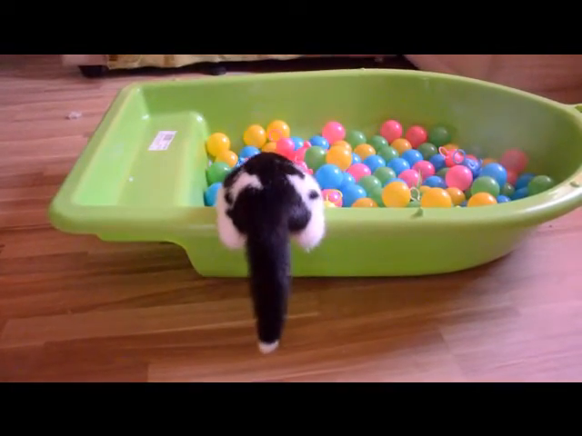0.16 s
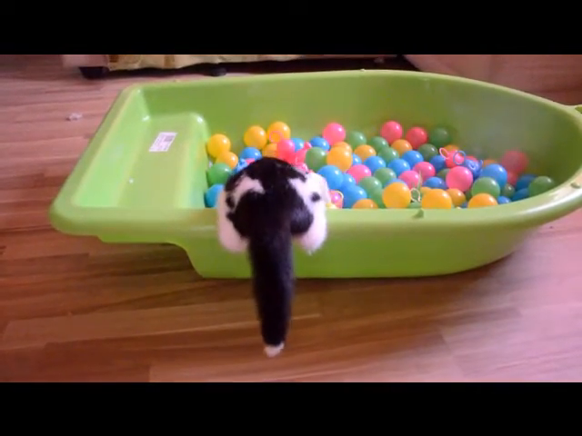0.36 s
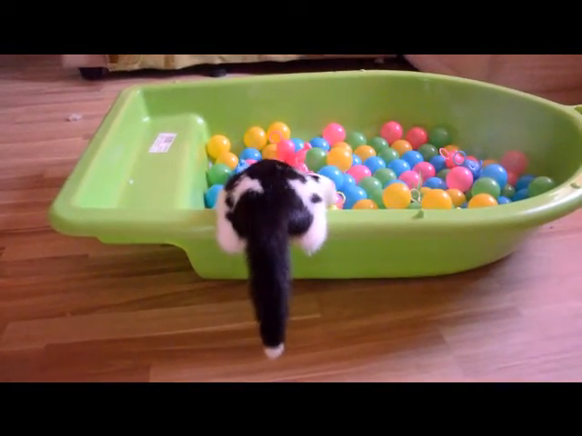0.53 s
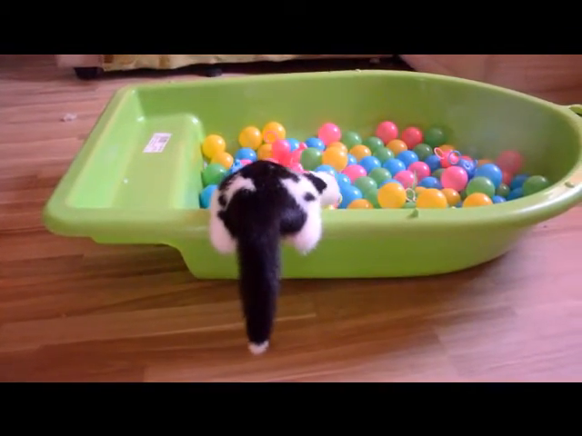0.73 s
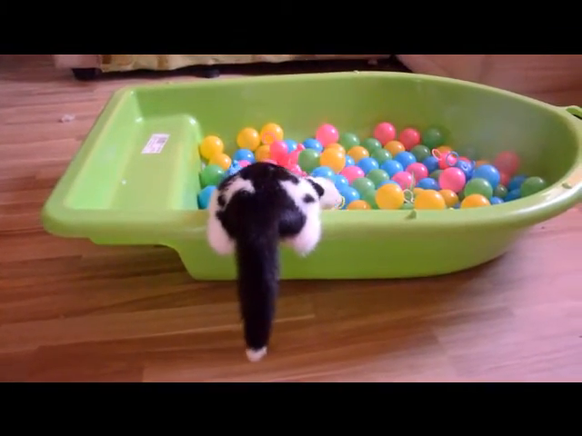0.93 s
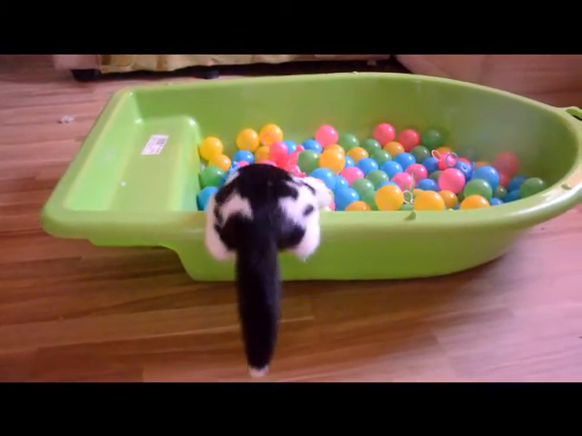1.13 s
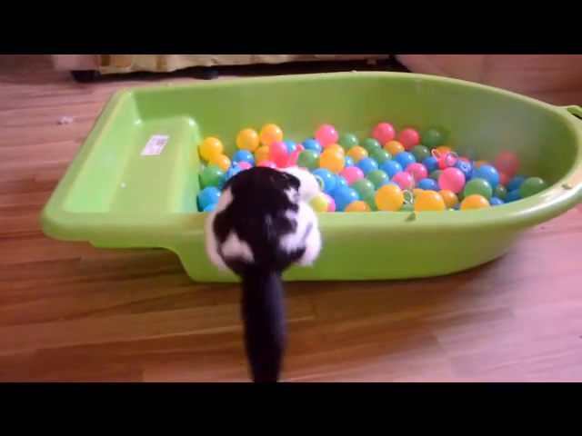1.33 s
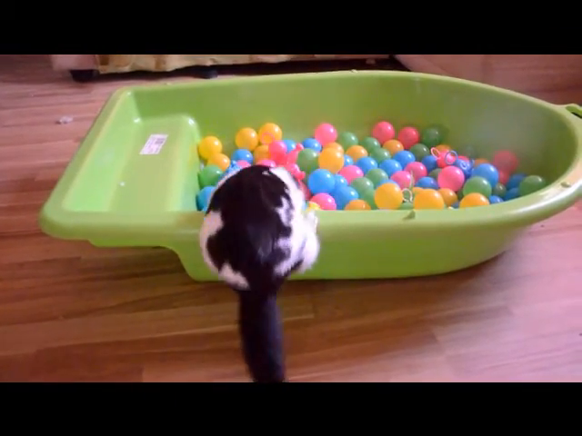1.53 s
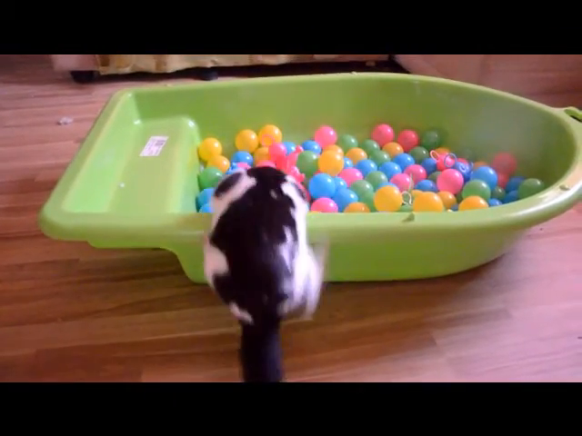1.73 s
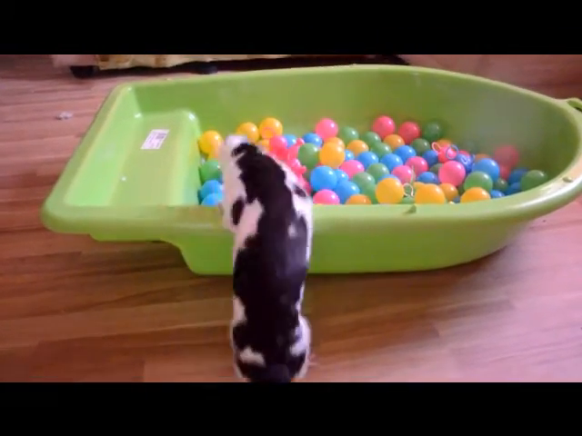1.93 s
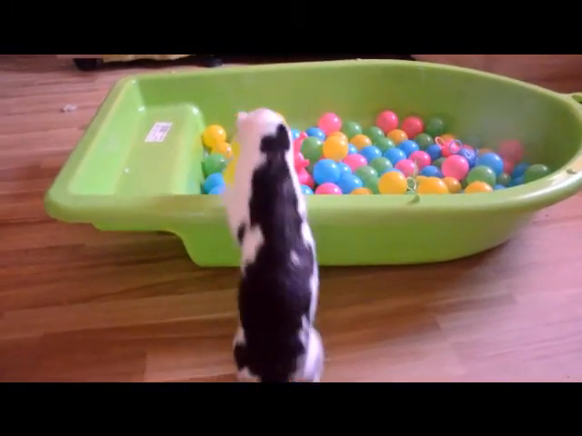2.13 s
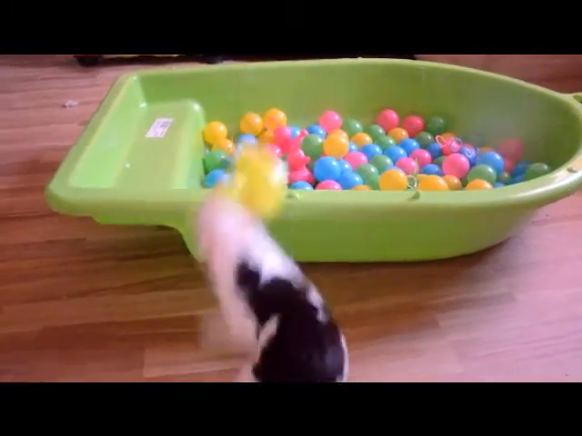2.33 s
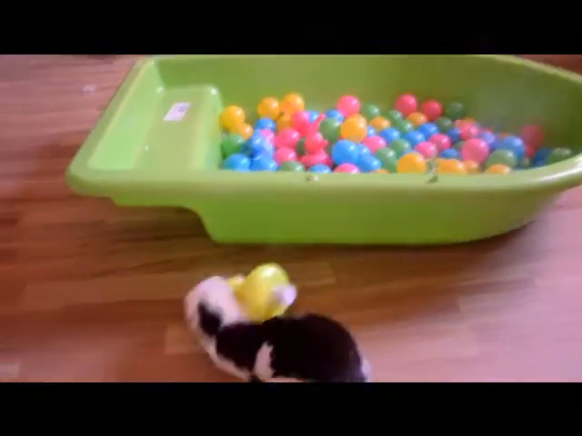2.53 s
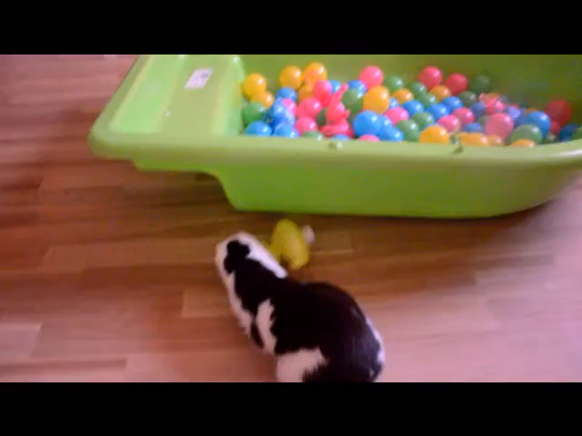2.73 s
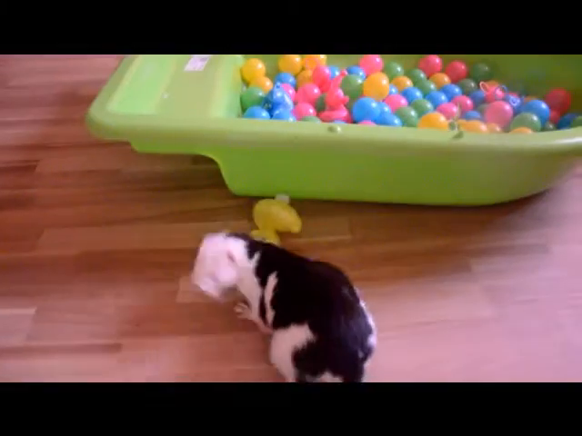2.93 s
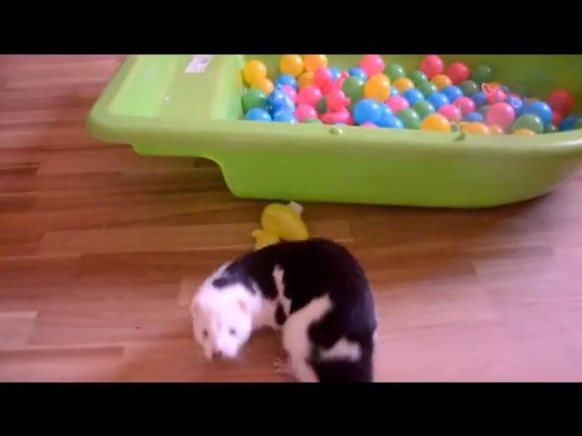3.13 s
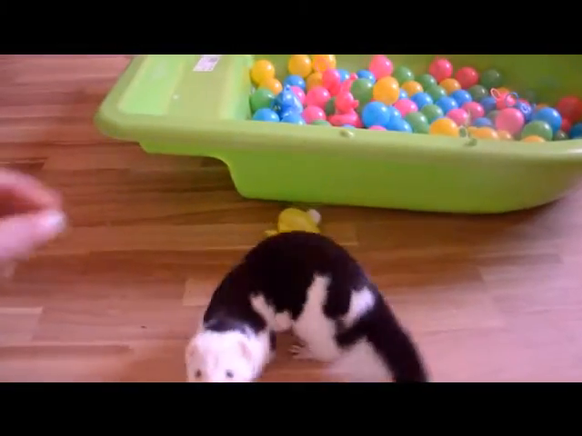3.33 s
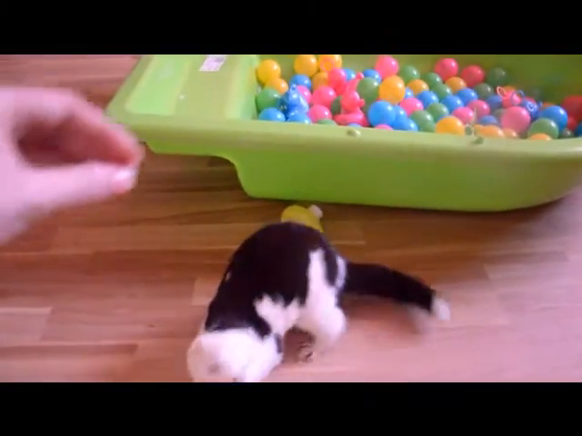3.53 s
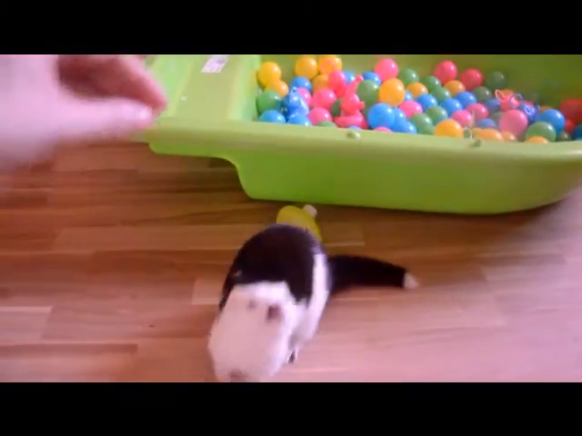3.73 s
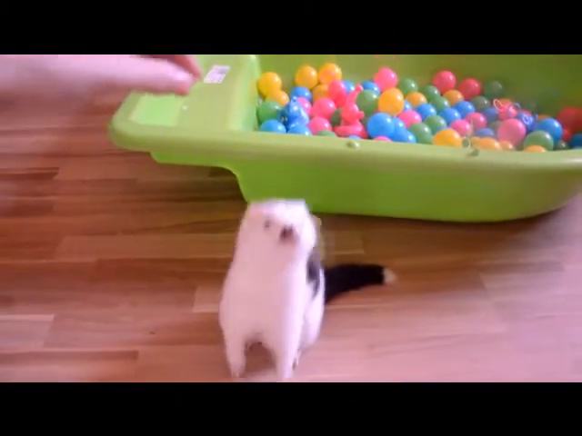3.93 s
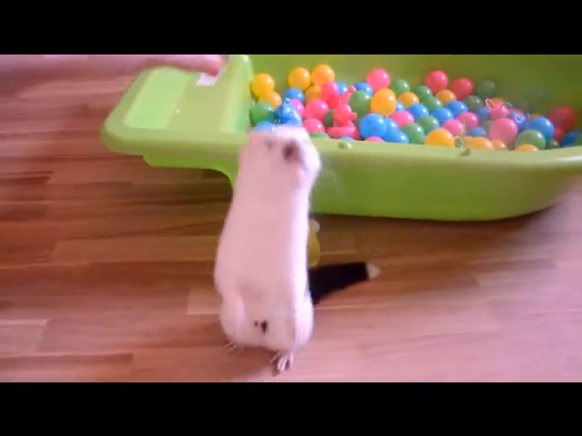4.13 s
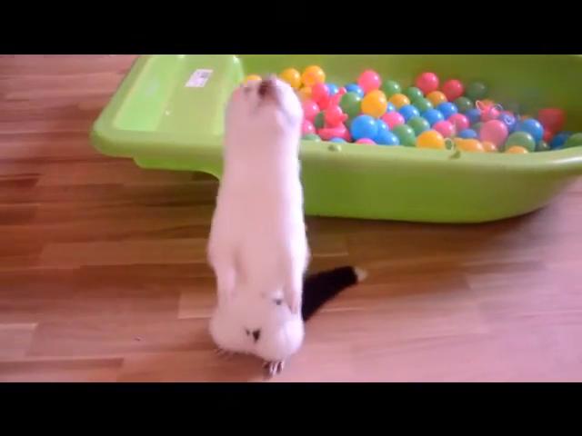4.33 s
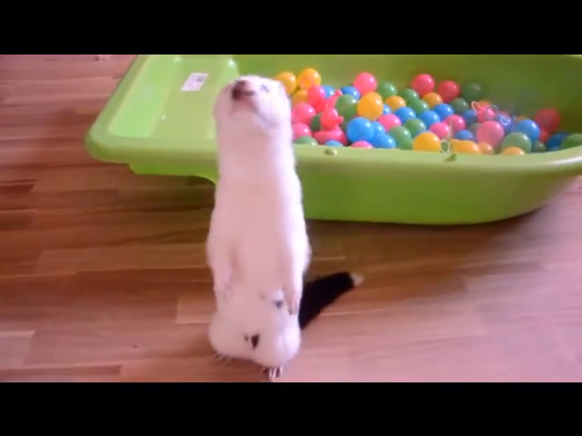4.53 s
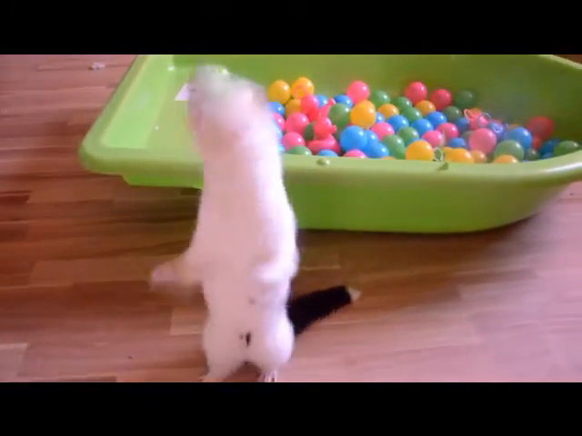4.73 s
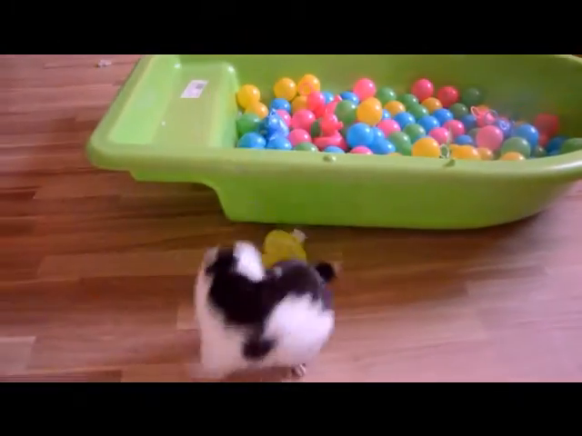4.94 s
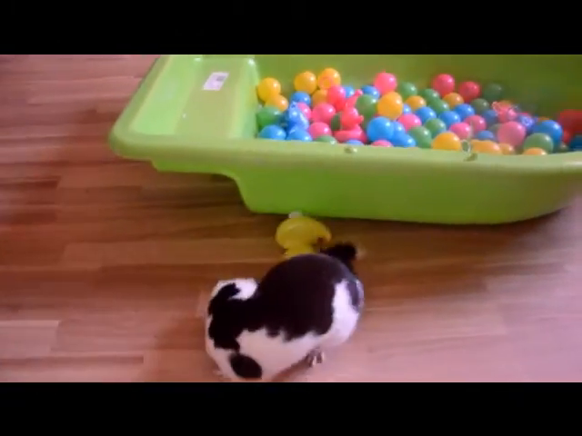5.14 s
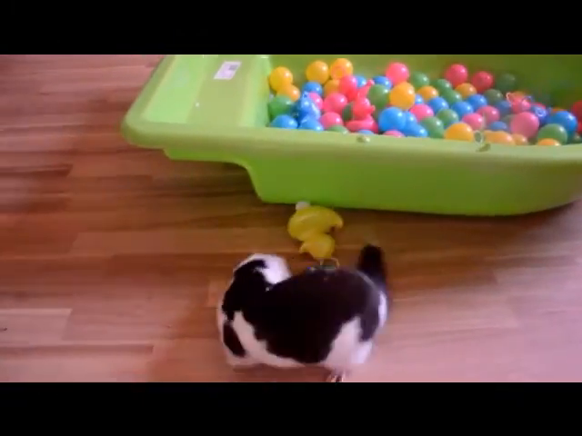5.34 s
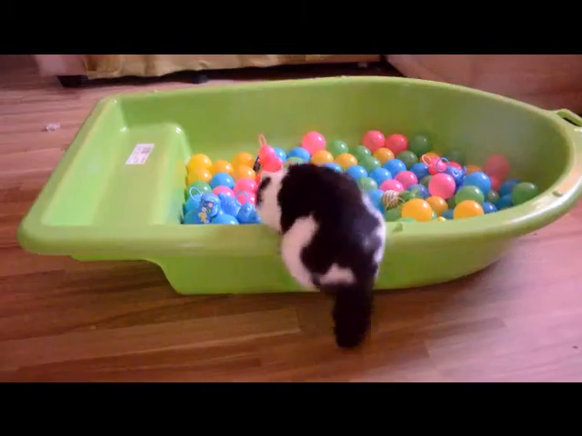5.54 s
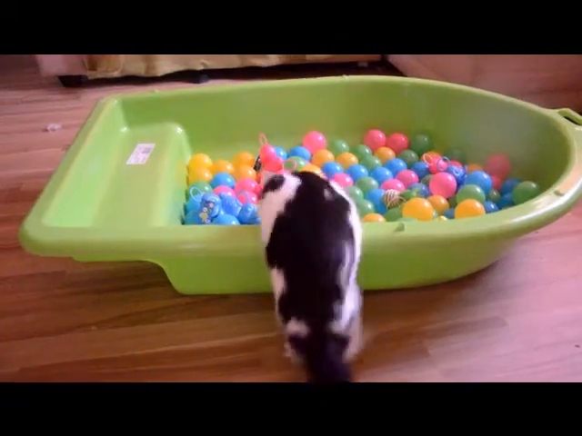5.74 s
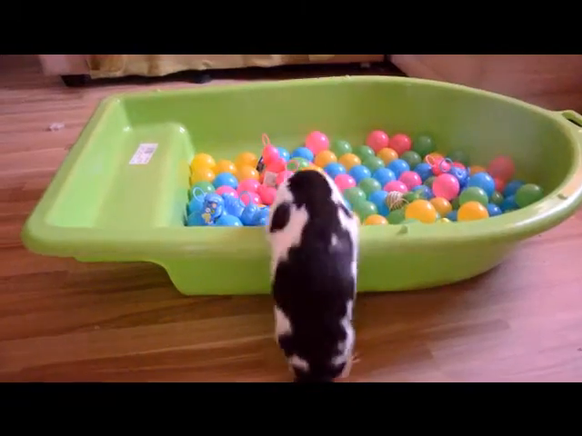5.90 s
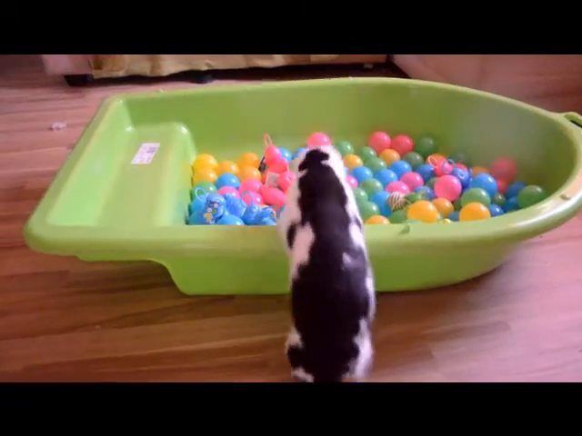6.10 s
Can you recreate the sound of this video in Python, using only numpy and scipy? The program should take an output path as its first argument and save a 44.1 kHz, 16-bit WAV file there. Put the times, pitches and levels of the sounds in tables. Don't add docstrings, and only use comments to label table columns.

```python
import sys
import numpy as np
from scipy import signal
from scipy.fft import rfft, irfft
from scipy.io import wavfile
from scipy.ndimage import uniform_filter1d

SR = 44100
rng = np.random.default_rng(int(sys.argv[2]) if len(sys.argv) > 2 else 0)


def gain_from_decibels(decibels):
    exponent = np.asarray(decibels, float) / 20
    return 10 ** exponent


def generate_wav(sig):
    pcm = np.round(np.clip(np.atleast_2d(sig).T, -1, 1) * 32767).astype(np.int16)
    wavfile.write(sys.argv[1], SR, pcm)


N = 276374


def rms_one(x):
    return x / np.sqrt(np.mean(x ** 2) + 1e-20)


def peak_one(x):
    return x / np.max(np.abs(x))


def at_hz(points, hz):
    points = np.array(points)
    return np.interp(np.log(hz + 1), np.log(points[:, 0]), points[:, 1])


def ring(x, hz, t60):
    r = gain_from_decibels(-60 / (t60 * SR))
    w = 2 * np.pi * hz / SR
    return signal.lfilter([0, np.sin(w)], [1, -2 * r * np.cos(w), r * r], x + 1e-18)


def resonate(x, hz, width):
    r = np.exp(-np.pi * width / SR)
    turn = 2 * np.pi * hz / SR
    y = signal.lfilter([1, 0, -1], [1, -2 * r * np.cos(turn), r * r], x + 1e-18)
    return np.sqrt(1 - r * r) * y / np.sqrt(2)


def body(x, peaks):
    return sum((-1) ** k * gain_from_decibels(db) * resonate(x, hz, width) for k, (hz, width, db) in enumerate(peaks))


# f/Hz, level/dB (per Hz)
HISS_COLOUR = [(18, -58), (30, -19.5), (43, -10.5), (92, -8.5), (146, -11), (644, -15.5), (1000, -10.5),
               (1680, -13), (2070, -18), (3220, -16), (14900, -24)]
# f/Hz, width/Hz, level/dB
FAN = [(60, 12, -76.5), (108, 8, -73), (477, 94, -70), (1253, 70, -72), (2094, 100, -66),
       (2725, 150, -70.5)]
# start t/s, f/Hz, width/Hz, level/dB
WHINE = (6, 6406, 500, -65)
HISS_DB = -59.5


def background():
    hiss = irfft(rfft(rng.standard_normal(N)) * gain_from_decibels(at_hz(HISS_COLOUR, np.fft.rfftfreq(N, 1 / SR))), N)
    air = rng.standard_normal(N)

    def breath(hz, width, db):
        return gain_from_decibels(db) * rms_one(resonate(resonate(air, hz, width), hz, width))

    fan = sum(breath(*peak) for peak in FAN)
    start_s, *peak = WHINE
    fan += breath(*peak) * (np.arange(N) > start_s * SR)
    return gain_from_decibels(HISS_DB) * rms_one(hiss) + fan


# f/Hz, fade by 60 dB t/s
ROOM = [(100, 0.27), (300, 0.27), (1000, 0.25), (4000, .38), (12000, 0.24)]
TAIL = SR // 2


def echo_noise():
    edges = 60 * 2. ** np.arange(9)
    t = np.arange(TAIL) / SR
    bands, decays = [], []
    for low in edges[:8]:
        octave = signal.butter(2, [low, 2 * low], "band", fs=SR, output="sos")
        bands.append(signal.sosfilt(octave, rng.standard_normal(N + TAIL)))
        onset = np.clip((t - .004) / 0.0047, 0, 1)
        decays.append(gain_from_decibels(-60 * t / at_hz(ROOM, 2.7 * low)) * onset)
    return np.array(bands), np.array(decays)


def add(out, s, layers, echo_dbs, echoes):
    at = round(s * SR)
    bands, decays = echoes
    tail = np.sum(bands[:, at:at + TAIL] * decays, axis=0)
    sent = sum(gain_from_decibels(db) * x for db, x in zip(echo_dbs, layers))
    wet = signal.fftconvolve(sent, tail / np.sqrt(np.sum(tail ** 2)))
    wet[:len(sent)] += sum(layers)
    out[at:at + len(wet)] += wet[:N - at]


def moves(starts, levels_db, holds, fall_db_per_s, rise_db_per_s):
    t = np.arange(0, N, 32) / SR
    late = t[:, None] - starts
    swell = rise_db_per_s * np.minimum(late, 0)
    fade = fall_db_per_s * np.maximum(late - holds, 0)
    power = np.sum(gain_from_decibels(levels_db + swell - fade) ** 2, axis=1)
    return np.interp(np.arange(N) / SR, t, power)


# t/s (at full strength), level/dB, held t/s
STEPS = [(0, -44, .03), (.25, -53, .1), (.58, -54, .01), (.77, -52, .13), (.99, -46, .05), (1.15, -48, .1),
         (1.385, -37, .02), (1.545, -41, .06), (1.7, -48, .18), (1.95, -37, .07), (2.42, -54, .13),
         (2.875, -26, .015), (3.02, -49, .19), (3.235, -32, .02), (3.43, -50, .01), (3.82, -60, .03),
         (4.45, -62, .2), (4.71, -49, .01), (4.81, -43, .03), (4.9, -45, .11), (5.035, -37, .015),
         (5.08, -42, .07), (5.315, -46, .01), (5.5, -46, .08), (5.615, -42, .03), (5.68, -48, .08),
         (5.89, -49, .08), (6.08, -45.5, .03), (6.15, -51, .12)]
# t/s (at full strength), level/dB, held t/s, scratch over rub level/dB
CHURNS = [(0, -48, .01, -14), (.25, -60, .1, -3), (.84, -55, .04, -5), (1.01, -50, .02, -6),
          (1.15, -51, .08, -2), (1.4, -41, .01, -12), (1.5, -49, .16, -6), (1.67, -41, .04, -5),
          (1.75, -50, .15, -7), (1.95, -36, .05, -25), (2.12, -38, .04, -4), (2.28, -56, .16, -1),
          (2.66, -42, .04, 1.5), (3, -58, .03, 5), (4.35, -61, .3, -10), (4.67, -62, .02, 9),
          (4.94, -53, .07, 4), (5.02, -55, .08, 7), (5.54, -45, .04, 1.5), (5.625, -39, .025, -10),
          (5.72, -52, .06, -3), (5.81, -50, .03, 5), (5.93, -45, .03, -20), (6.11, -46.5, .04, -12),
          (6.19, -62, .08, 10)]
# t/s (at full strength), level/dB, held t/s
BRUSHES = [(.98, -51, .06), (1.15, -50, .05), (1.37, -51, .02), (1.51, -42, .03), (1.68, -56, .06),
           (2.02, -52, .01), (2.35, -53, .04), (2.59, -33, .04), (2.89, -44, .03), (3.04, -60, .17),
           (4.81, -52, .02), (4.94, -49, .09), (5.56, -50, .03), (5.62, -39, .02), (5.83, -50, .01),
           (6.2, -56, .07)]
RUB_UNDER_STEP_DB, SCRATCH_UNDER_STEP_DB, SHUFFLE_UNDER_CHURN_DB = -13, -21, -11
REST_SHUFFLE_DB, REST_RUB_DB, REST_FUR_DB, REST_SCRATCH_DB = -72, -72, -64, -71
CHURN_RISE_DB_PER_S, STEP_RISE_DB_PER_S = 400, 900
STEP_FALL_DB_PER_S, CHURN_FALL_DB_PER_S, BRUSH_FALL_DB_PER_S = 330, 170, 300


def efforts():
    s, db, held, scratch_db = np.transpose(CHURNS)
    step = moves(*np.transpose(STEPS), STEP_FALL_DB_PER_S, STEP_RISE_DB_PER_S)
    brush = moves(*np.transpose(BRUSHES), BRUSH_FALL_DB_PER_S, STEP_RISE_DB_PER_S)
    churn = moves(s, db, held, CHURN_FALL_DB_PER_S, CHURN_RISE_DB_PER_S)
    sharp = moves(s, db + scratch_db, held, CHURN_FALL_DB_PER_S, CHURN_RISE_DB_PER_S)
    shuffle = step + churn * gain_from_decibels(SHUFFLE_UNDER_CHURN_DB) ** 2 + gain_from_decibels(REST_SHUFFLE_DB) ** 2
    rub = churn + step * gain_from_decibels(RUB_UNDER_STEP_DB) ** 2 + gain_from_decibels(REST_RUB_DB) ** 2
    fur = brush + gain_from_decibels(REST_FUR_DB) ** 2
    scratch = sharp + step * gain_from_decibels(SCRATCH_UNDER_STEP_DB) ** 2 + gain_from_decibels(REST_SCRATCH_DB) ** 2
    return np.sqrt([shuffle, rub, fur, scratch])


def grains(per_s, spread_db):
    sizes = gain_from_decibels(spread_db * np.minimum(rng.exponential(1, N), 4)) * rng.choice([-1, 1], N)
    return rms_one(sizes * (rng.random(N) < per_s / SR))


# f/Hz, level/dB, fade by 60 dB t/s
BOARDS = [(221.4, -11, 0.2), (274.5, 4, 0.086), (344.4, -2.5, 0.095), (402.5, -8.5, .12)]
# f/Hz, width/Hz, level/dB
BALLS = [(725, 320, 3), (1066, 610, 4.5), (1438, 1400, 5)]
# f/Hz, width/Hz, level/dB
FUR = [(2100, 1100, -2), (2900, 1500, 0), (4100, 2200, -7)]
# f/Hz, width/Hz, level/dB
BRIGHT = [(5370, 4160, -4), (8030, 2000, -0.5), (9415, 2000, -0.5), (11800, 5000, -14.5)]


def stirring():
    shuffling, rubbing, brushing, scratching = efforts()
    steps = grains(550, 3.6)
    shuffle = rms_one(sum(gain_from_decibels(db) * ring(steps, hz, 0.43 * t60) for hz, db, t60 in BOARDS))
    rub = rms_one(resonate(body(grains(1200, 2.6), BALLS), 790, 1800))
    fur = rms_one(body(body(grains(4000, 3), FUR), FUR))
    scratch = rms_one(body(grains(4600, 4.2), BRIGHT))
    low = gain_from_decibels(-2) * shuffling * shuffle
    middle = gain_from_decibels(-3.5) * rubbing * rub + gain_from_decibels(-5.5) * brushing * fur
    high = gain_from_decibels(-6) * scratching * scratch
    return low, middle, high


# t/s, knock level/dB, shake level/dB, tick level/dB, contact spread t/s
TUB_BUMPS = [(.731, -45.5, -50, -63, .008), (.986, -36, -40, -46, .012), (1.368, -32.5, -38, -47, .014),
             (1.38, -32, -32, -46, .0057), (1.401, -26, -34, -55, .008), (1.544, -33, -43, -56, .012),
             (1.845, -34.5, -36.5, -44.5, .0046), (1.943, -21, -33, -70, .007),
             (2.136, -22.5, -27, -28.5, .016), (2.358, -31.5, -40.5, -42, .0058),
             (2.885, -27, -30, -31, .017), (3.271, -36.5, -35, -50, .0053),
             (5.613, -19.5, -33.5, -36, .0043)]
# t/s, knock level/dB, tick level/dB, knock colour f/Hz
CLACKS = [(.849, -36, -56, 1100), (1.671, -24.5, -17.5, 1720), (1.693, -21, -33, 880),
          (1.712, -26.5, -30, 1400), (1.733, -20.5, -26, 1750), (1.997, -22, -48, 910),
          (1.999, -31, -50, 3800), (2.285, -31, -48, 950), (2.403, -34, -41, 1880),
          (2.449, -39.5, -43, 1880), (5.508, -39, -47.5, 1360), (5.551, -26, -34.5, 920),
          (5.556, -29.5, -30, 1600), (5.717, -35, -62, 1350), (5.804, -31, -33, 1700),
          (5.918, -31, -54, 735), (6.11, -27.5, -65, 890)]
# t/s, knock level/dB, tick level/dB, knock colour f/Hz
CLAWS = [(1.144, -42, -55, 2550), (1.205, -41, -37, 2730), (1.504, -31, -56, 2700), (1.53, -32, -60, 2800),
         (2.752, -27.5, -40, 2320), (3.047, -37, -39, 2900), (3.073, -37.5, -49, 2900),
         (3.096, -37, -46, 4230), (3.137, -45, -47, 4396), (3.157, -39, -45, 2790), (3.177, -48, -52, 3680),
         (3.203, -38, -47, 3200), (5.483, -44, -52, 2940), (5.947, -27, -38, 4300), (5.974, -32, -46, 4500)]
TUB_HZ = 860
CLACK_SPREAD_S, CLACK_SHAKE_DB = .0055, -22
CLAW_SPREAD_S, CLAW_SHAKE_DB = .004, -19


def contacts():
    rows = [(s, knock, shake, tick, TUB_HZ, spread) for s, knock, shake, tick, spread in TUB_BUMPS]
    rows += [(s, knock, knock + CLACK_SHAKE_DB, tick, hz, CLACK_SPREAD_S) for s, knock, tick, hz in CLACKS]
    rows += [(s, knock, knock + CLAW_SHAKE_DB, tick, hz, CLAW_SPREAD_S) for s, knock, tick, hz in CLAWS]
    return rows


# t/s, level/dB, f/Hz, fade by 60 dB t/s
SQUEAKS = [
    (5.482, -38.5, 1360, 0.087),
    (5.5, -43, 1420, 0.044),
    (5.08, -39, 276, .4),
    (5.109, -35, 276, .17),
    (3.047, -50, 2800, .12),
    (3.073, -50, 2820, .15),
    (3.157, -54, 2800, .15),
    (2.403, -42, 2050, .05),
    (2.449, -45, 2100, .06),
]
HOLLOW_WIDTH, MAX_WIDTH_HZ = 1.1, 1900


def bumps(echoes):
    out, t = np.zeros(N), np.arange(SR // 5) / SR
    for s, knock_db, shake_db, tick_db, hz, spread in contacts():
        noise = rng.standard_normal((3, len(t)))
        fade = np.exp(-t / np.clip(spread, 5e-4, .04))
        chatter = noise * np.abs(noise) * fade * np.minimum(t / 0.0011, 1)
        shake = sum(gain_from_decibels(db) * ring(chatter[0], f, 1.2 * t60) for f, db, t60 in BOARDS)
        width = min(HOLLOW_WIDTH * hz, MAX_WIDTH_HZ)
        knock = resonate(resonate(chatter[1], hz, width), hz, width)
        touch = chatter[2] * (1 + 3 * np.exp(-t / .0015)) + 5.0 * (t == t[9])
        tick = body(touch, BRIGHT)
        layers = [gain_from_decibels(shake_db + 1) * peak_one(shake),
                  gain_from_decibels(knock_db - 2) * peak_one(knock),
                  gain_from_decibels(tick_db + 5.5) * peak_one(tick)]
        add(out, s, layers, [-3, -3, -3], echoes)
    for s, db, hz, t60 in SQUEAKS:
        out[round(s * SR):][:len(t)] += gain_from_decibels(db) * np.sin(2 * np.pi * hz * t) * gain_from_decibels(-60 * t / t60)
    return out


def bending(t, hz, turns, fall_s):
    cycles = hz * t + turns * (1 - np.exp(-t / fall_s))
    return np.sin(2 * np.pi * cycles) * (1 - np.exp(-t / .0012))


def splinters(noise, t, length_s):
    crack = noise * np.abs(noise) * 0.35 * np.exp(-t / length_s)
    crack[0] = 2.1
    return crack


# t/s, thud level/dB, knock level/dB, tick level/dB, thud f/Hz
DROPS = [(2.106, -14.5, -8.5, -20, 253), (2.5766, -3, -9, -17, 274), (2.623, -10.5, -22, -24, 259.5),
         (2.713, -9.5, -22.5, -31, 267.5), (2.776, -13, -26, -30.5, 263.6),
         (2.823, -14.5, -25.5, -33.5, 276), (2.863, -13, -18.5, -25.5, 353), (3.226, -20, -24, -44, 320),
         (3.426, -37, -46.5, -70, 287), (3.81, -51, -63, -67.5, 404), (4.696, -44, -55, -61.5, 202),
         (4.803, -32.5, -40, -54, 216), (4.928, -39, -43, -47, 341), (5.033, -33, -41, -44, 369),
         (5.303, -34.5, -47, -64, 285.6), (6.073, -29, -43, -51, 264), (6.2545, -22.5, -29, -41, 240)]
# f/Hz, level/dB, fade by 60 dB t/s
TOY = [(202.4, -14, 0.1), (467, -8.5, 0.0295), (690, -8, .02), (879, -1, 0.017), (980, -3, 0.024),
       (1310, -4, .015), (1590, -2.5, 0.013), (1880, -4.5, .015)]
# f/Hz, width/Hz, level/dB
CRACK = [(2900, 2000, 2.5), (4800, 4100, 1), (9100, 2500, -3.5)]
# t/s, level/dB, f/Hz
SLAM = (2.5782, 7, 300)
# t/s, level/dB, f/Hz, fade by 60 dB t/s
BOOM = (2.107, -18, 95, .15)
RING_T60_S, DAMPED_T60_S, RING_S_PER_DB = .18, .04, .012
JOIST_HZ, JOIST_DB, JOIST_T60_S = 205, -19, .22


def drops(echoes):
    out, t = np.zeros(N), np.arange(SR // 4) / SR
    strike = t * np.exp(-t / 0.00007)
    joist = gain_from_decibels(JOIST_DB - 60 * t / JOIST_T60_S) * np.sin(2 * np.pi * JOIST_HZ * t) * (1 - np.exp(-t / .004))
    for s, thud_db, knock_db, tick_db, hz in DROPS:
        noise = rng.standard_normal(len(t))
        t60 = min(RING_T60_S, DAMPED_T60_S - RING_S_PER_DB * thud_db)
        fade = np.exp(-t / .0028) + .28 * gain_from_decibels(-60 * t / t60)
        push = bending(t, hz, turns=.3, fall_s=.0008) * fade + joist
        knock = sum(gain_from_decibels(db + 2 * noise[-k - 1]) * ring(strike, f, ring_s)
                    for k, (f, db, ring_s) in enumerate(TOY))
        snap = splinters(noise, t, 0.0039)
        crack = sum(gain_from_decibels(db) * resonate(snap, f, width) for f, width, db in CRACK)
        layers = [gain_from_decibels(thud_db + 5) * push,
                  gain_from_decibels(knock_db + 8.5) * peak_one(knock),
                  gain_from_decibels(tick_db + 11) * peak_one(crack)]
        add(out, s + 0.000912, layers, [-12.5, -4, -4], echoes)
    s, slam_db, hz = SLAM
    slam = -gain_from_decibels(slam_db) * bending(t, hz, turns=1.4, fall_s=.002) * np.exp(-t / .0022)
    add(out, s, [slam], [-18], echoes)
    s, boom_db, hz, t60 = BOOM
    boom = gain_from_decibels(boom_db - 60 * t / t60) * np.sin(2 * np.pi * hz * t)
    add(out, s, [boom], [-5], echoes)
    return out


MIC_LOW_HZ, MIC_TOP_HZ = 157, 12900


def scene():
    echoes = echo_noise()
    stir = np.zeros(N)
    add(stir, 0, stirring(), [-6, -6, -6], echoes)
    contact = stir + bumps(echoes) + drops(echoes)
    lean = signal.sosfilt(signal.butter(2, MIC_LOW_HZ, "high", fs=SR, output="sos"), contact)
    lean = signal.sosfilt(signal.butter(4, MIC_TOP_HZ, fs=SR, output="sos"), lean)
    return (lean + background())[None]


QUIET_DB, BUSY_DB, LOUD_DB = -62, -50, -36
WIDE_HZ, NARROW_HZ, LOUD_HZ = 14700, 13900, 12900


def narrowed(x):
    hz, s, spec = signal.stft(x, SR, nperseg=2048, noverlap=1024)
    power = uniform_filter1d(x[0] ** 2, size=8192)
    level_db = 10 * np.log10(power[np.minimum(s * SR, N - 1).astype(int)] + 1e-12)
    jitter = 350 * np.repeat(rng.integers(-1, 2, len(s)), 3)[:len(s)]
    edge = np.where((level_db > BUSY_DB) | (level_db < QUIET_DB), NARROW_HZ, WIDE_HZ) + jitter
    edge[level_db > LOUD_DB] = LOUD_HZ
    return signal.istft(spec * (hz[:, None] < edge), SR, nperseg=2048, noverlap=1024)[1][:, :N]


def low_pass(x):
    return signal.sosfilt(signal.butter(12, 15080, fs=SR, output="sos"), x)


# t/s, level/dB
DIP = [
    (5.3805, 0),
    (5.3815, -17),
    (5.395, -22),
    (5.402, -35),
    (5.4145, -26),
    (5.4155, -9),
    (5.48, -3),
    (5.52, 0),
]
OVERLOAD = .51


def record(dry):
    s, db = np.transpose(DIP)
    gain = gain_from_decibels(np.interp(np.arange(N) / SR, s, db))
    mix = narrowed(np.clip(dry, -OVERLOAD, OVERLOAD) * gain)
    return low_pass(mix)


dry = scene()
out = record(dry)
generate_wav(out)
```